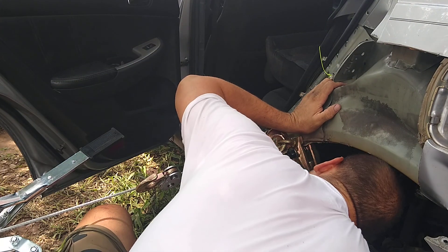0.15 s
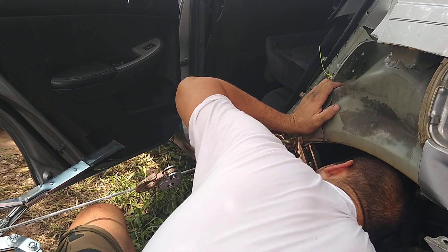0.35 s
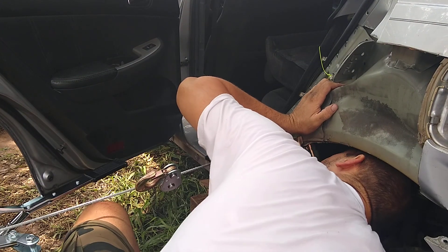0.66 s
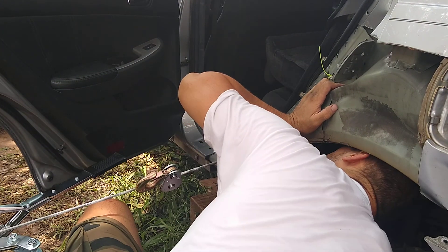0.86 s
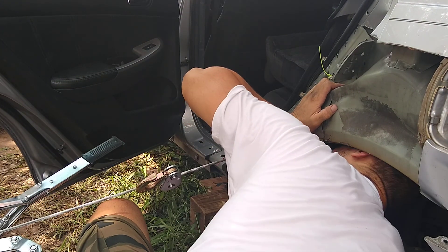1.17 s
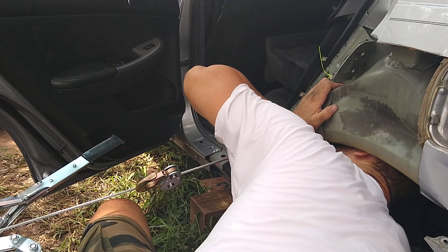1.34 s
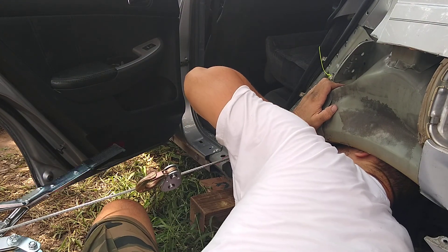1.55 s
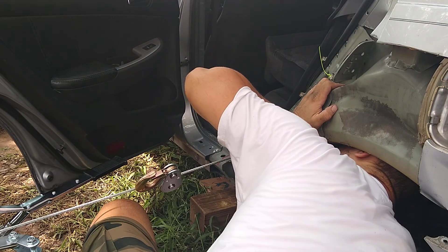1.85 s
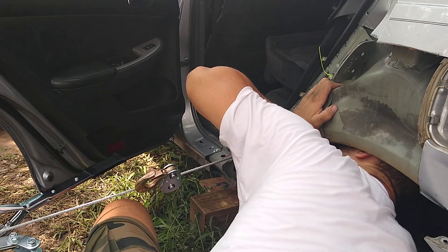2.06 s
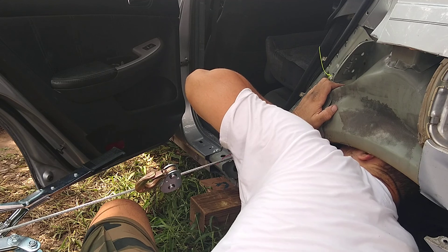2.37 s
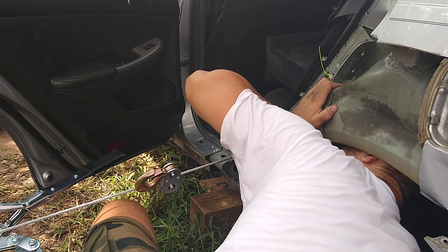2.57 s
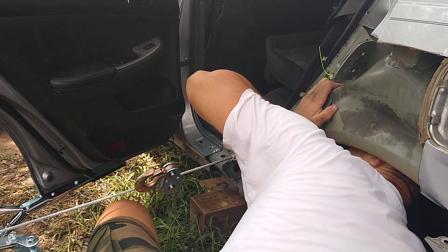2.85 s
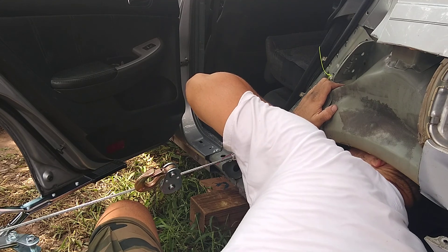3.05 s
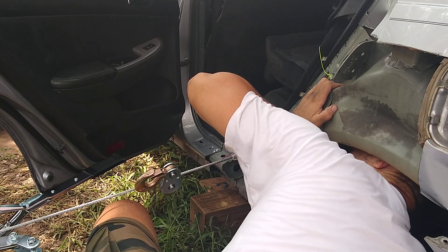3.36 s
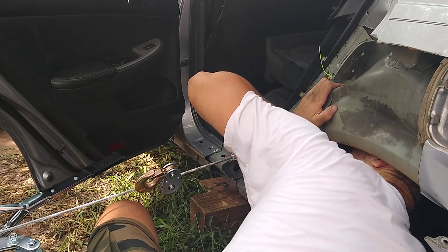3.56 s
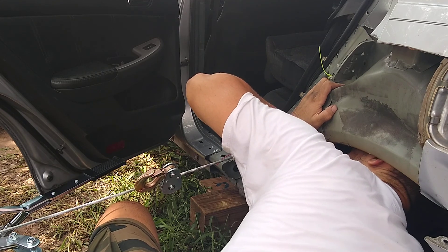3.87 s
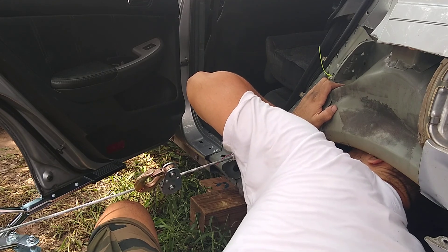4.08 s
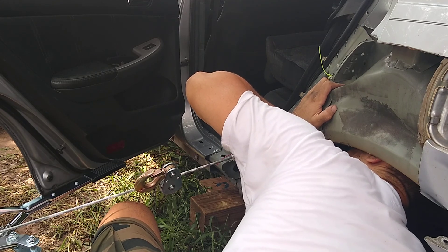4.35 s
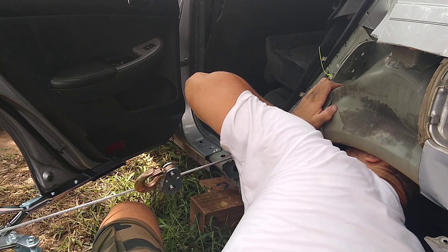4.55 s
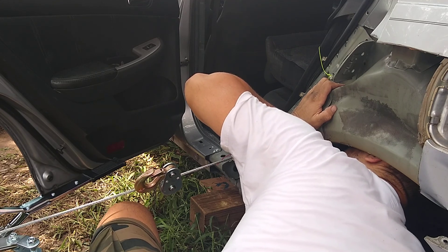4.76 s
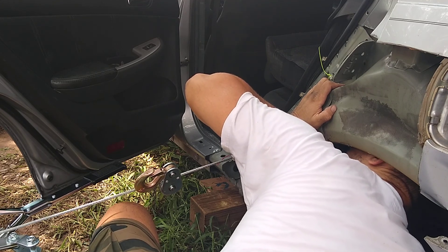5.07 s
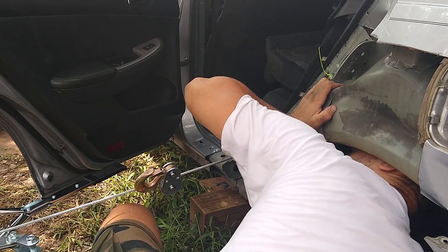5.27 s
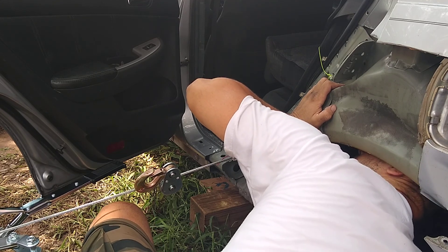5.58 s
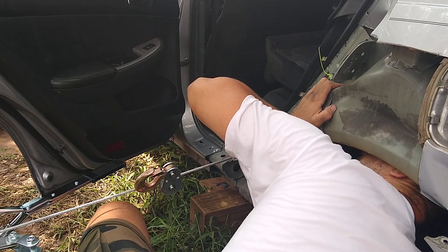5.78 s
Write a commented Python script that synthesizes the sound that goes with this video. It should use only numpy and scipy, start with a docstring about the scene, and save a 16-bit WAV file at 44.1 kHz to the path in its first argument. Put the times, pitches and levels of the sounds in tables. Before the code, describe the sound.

Outdoors and close to the microphone, a dent is hammered out of a car's wheel arch. A tool scuffs softly, one light tap follows, then steady, loud blows begin. Three loose clangs with quick rebounds give way to three firmer thuds, then five more ringing sheet metal clangs. After a slight gap, one dull blow ends the run. A very quiet open-air rumble and hum lie underneath.

```python
"""Faint scuffs of a tool being placed, a light tap, then a hammer knocks a dent out of a car's rear wing
from inside the wheel arch, outdoors, close by. On loose sheet the blow clangs and the head often drops
back onto the metal; on a braced spot it gives one duller thud. Each contact is a noise crack plus decaying
panel modes. The hollow body rings on briefly, over a low rumble and a faint hum."""
import sys
import numpy as np
from scipy import signal
from scipy.fft import rfft, irfft, next_fast_len
from scipy.io import wavfile

SR = 44100
rng = np.random.default_rng(int(sys.argv[2]) if len(sys.argv) > 2 else 0)


def file_out(sig):
    """Save sig as 16-bit WAV at sys.argv[1]."""
    # one column per channel
    cols = np.atleast_2d(sig).T
    # limit, then scale
    lim = np.clip(cols, -1, 1)
    pcm = np.round(lim * 32767).astype(np.int16)
    wavfile.write(sys.argv[1], SR, pcm)


N = 261072
RING_S = np.arange(24576) / SR  # time axis of one contact
LEFT_RIGHT = np.array([[1], [-1]])

# (time [s], level [dB], spot [0 loose, 1 braced], bite [dB], after-ring [dB])
# bite: treble of a square hit against a glancing one
HAMMER_BLOWS = [ (1.283, -12, .9, -27.5, -7), (1.619, 1, 0.078, -1.5, -5), (2.006, 0, .1, -1.5, 0.5),
                (2.428, .5, 0.11, -3, -1), (2.869, 1, 0.77, -8.5, -4), (3.240, -3.5, 0.98, 2, -4.5),
                (3.516, -1, 0.93, -1, -2.5), (3.831, .5, .15, 1.5, -3.5), (4.123, -0.5, 0, -0.5, -1),
                (4.454, 0, 0.058, -6.5, 1), (4.764, .5, .1, 0, 3), (5.082, 1, 0.054, -2.5, 0.5),
                (5.670, 1, 1, -14.5, -3.5)]
# (frequency [Hz], loose gain [dB], braced gain [dB], bite share [dB/dB])
BLOW_EQ = [(300, 1.2, 2, 0.1657), (750, 0, -0.5, 0), (1400, -.5, -6.5, 0.23), (3480, 0.7, -2, 0.78),
           (10000, 1.5, 1.5, 1.5)]
# (time [s], level [dB])
HAMMER_REBOUNDS = [(1.405, -28.5), (1.693, -5), (2.063, -1), (2.117, -8), (2.542, -5), (4.181, -4),
                   (4.513, -4), (4.823, -2.5), (5.132, -2)]
# contact crack: (frequency [Hz], gain [dB])
CRACK_EQ = [(50, -38), (200, -14.5), (800, 4.5), (2000, -1), (4300, -4.5), (5700, -17.5), (7000, -21),
            (12000, -32.5), (16000, -31.5)]
# (frequency [Hz], loose level [dB], braced level [dB], t60 [s])
WING_MODES = [ (142.3, -33, -29, 0.48), (185, -34.5, -16, 0.17), (228, -11.5, -19, 0.15),
              (243.9, -17, -6.5, 0.12), (253.2, -24, -51.5, 0.37), (302, -37.5, -20, 0.084),
              (342.9, -23.5, -3, .085), (393, -35.5, -13, .1), (423, -25, -24.5, 0.032),
              (472.9, -24, -24.5, 0.2), (513, -26.5, -21.5, 0.19), (602.8, -24, -22, 0.15),
              (647, -37.5, -22, 0.039), (722, -16.5, -32.5, .11), (804.4, -21.5, -33, 0.23),
              (855, -24, -19.5, 0.14), (1029, -19.5, -25, 0.051), (1060.8, -17.5, -31, 0.18),
              (1190, -33.5, -39, 0.25), (1414, -26.5, -43, 0.22), (1474, -19.5, -32.5, 0.039),
              (1685, -34.5, -40.5, 0.33), (1680, -33, -46.5, 0.067), (2075, -27, -28.5, 0.13),
              (2450, -21, -45, 0.12), (2675, -28, -16, 0.047), (3050, -35, -44.5, 0.032),
              (3540, -34.5, -57, 0.078), (3450, -37, -46, 0.078), (3650, -33, -53, .08)]
# crowded modes: (centre [Hz], clang [dB], clang t60 [s], after-ring [dB], its t60 [s], L/R likeness [0-1])
SHEET_BANDS = [ (40.6, -27.5, 0.2, -39.5, .5, 0.2), (108, -21, 0.33, -15, 0.96, 0.7),
               (225, -2.5, 0.033, -1, 0.43, 0.2), (396, 1, 0.11, -10.5, 0.39, 0.8),
               (910, 5, 0.069, -16, 0.42, 0.92), (1520, -0.5, .09, -19.5, 0.43, 0.6),
               (2266, -7.5, 0.027, -21.5, .37, 0.89), (2970, -3, 0.068, -21, 0.39, 0),
               (4480, -12.5, 0.017, -25, 0.34, 0.8), (5260, -13, 0.059, -34, 0.44, 0.2),
               (6500, -28, 0.066, -42, .36, 0.6), (15300, -39, 0.088, -59.5, 0.69, 0.15)]
# bodywork tones: (time [s], frequency [Hz], level [dB], t60 [s])
BODY_TONES = [(3.242, 1270, -17.5, 0.086), (3.241, 1930, -11.5, 0.072), (3.515, 1408, -51.5, 0.56),
              (5.082, 1324, -62, 1.8), (5.669, 1402, -47, 0.55)]
# (time [s], level [dB], time to fall 30 dB [s])
TOOL_SCUFFS = [(.004, -39.5, 0.058), (0.058, -52, 0.14), (0.094, -50.5, 0.16)]
# (frequency [Hz], gain [dB])
SCUFF_EQ = [(100, 7.5), (400, 11), (800, -2.5), (1400, -1.5), (2200, -7.5), (3300, -3.5), (5600, -15.5),
            (8000, -31)]
# open air: (frequency [Hz], relative density [dB])
RUMBLE_EQ = [(15, -69), (25, -31), (120, 3), (185, -4), (206, -4), (285, -0.5), (326, -6), (476, -17),
             (575, -17), (714, -22.5), (775, -17.5), (936, -22.5), (1190, -23), (2000, -34), (16000, -49.5)]
# (frequency [Hz], level [dB])
HUM_TONES = [(118, -74), (245, -75), (294, -78), (769, -79), (829, -84.5)]
# microphone ports: (frequency [Hz], left minus right [dB])
MIC_BALANCE = [(60, 3.5), (110, 4), (200, -4.5), (380, -1.5), (700, -3), (1290, 0.5), (2380, -0.5),
               (4400, 2), (8120, 3.5), (15000, 0.5)]
# microphone ports: (frequency [Hz], left lead [rad])
MIC_PHASE = [(0, 0), (1380, 0.0), (2070, -3.4), (2580, -3.3), (3960, -9.2), (4650, -9.6), (5000, -9.8),
             (5430, -7.0), (6720, -3.2), (9300, -10.6), (12200, -2.2), (13700, -6.6), (15300, -0.2),
             (16100, 0.5)]


def hammer_blows(shared_noise, contact_s=0.0009, softening=0.85):
    """Blows coloured by where and how squarely they land; a light tap presses home more slowly."""
    out = np.zeros((2, N))
    hz, loose_db, braced_db, bite_share = np.transpose(BLOW_EQ)
    for start_s, db, braced, bite_db, ring_db in HAMMER_BLOWS:
        press = 1 - np.exp(-RING_S * undb(db * softening) / contact_s)
        tone_db = loose_db + braced * (braced_db - loose_db) + bite_share * bite_db
        blow = strike(shared_noise, braced, ring_db) * press
        add(out, start_s, undb(db) * colour(blow, list(zip(hz, tone_db))))
    return out


def hammer_rebounds(shared_noise, settle_s=0.0014):
    """The loosely held head drops back; settling blunts the attack, and weaker rebounds are duller."""
    out = np.zeros((2, N))
    settle = 1 - np.exp(-RING_S / settle_s)
    for start_s, db in HAMMER_REBOUNDS:
        treble_db = -8 + 1.2 * db
        eq = [(250, -4), (1000, treble_db * .6), (4000, treble_db), (12000, treble_db * 1.7)]
        rebound = strike(shared_noise, braced=0, ring_db=-3) * settle
        add(out, start_s, undb(db) * colour(rebound, eq))
    return out


def strike(shared_noise, braced, ring_db, shared_power=0.33):
    """Steel on sheet: crack, clang, after-ring and wing modes, partly alike in every contact."""
    fresh_noise = rng.standard_normal(shared_noise.shape)
    crack_noise, sheet_noise = np.sqrt(shared_power) * shared_noise + np.sqrt(1 - shared_power) * fresh_noise
    crack = colour(stereo(*crack_noise, likeness=1) * decay(t60_s=.028), CRACK_EQ)
    clang, after_ring = sheet_modes(sheet_noise)
    return uneven_radiation(crack + clang + undb(ring_db) * after_ring) + wing_modes(braced)


def wing_modes(braced, detune=.005, scatter_db=2.07, phase_spread_rad=0.13):
    """Separate modes; each blow lands a little elsewhere and weights them anew."""
    out = np.zeros((2, len(RING_S)))
    for hz, loose_db, braced_db, t60_s in WING_MODES:
        level_draw, pitch_draw, phase_draw = rng.standard_normal(3)
        db = loose_db + braced * (braced_db - loose_db) + scatter_db * level_draw
        phase = 2 * np.pi * hz * (1 + detune * pitch_draw) * RING_S
        offset_rad = LEFT_RIGHT / 2 * phase_spread_rad * phase_draw
        envelope = build_up(hz, cycles=0.99) * decay(t60_s) * (RING_S < t60_s)
        out += undb(db) * np.sin(phase + offset_rad) * envelope
    return out


def sheet_modes(noise, spread_s=0.0041):
    """Crowded modes as noise bands: a fast clang, then a slower ring spreading through the body."""
    spectrum, hz = rfft(noise), np.fft.rfftfreq(len(RING_S), 1 / SR)
    centres_hz = [row[0] for row in SHEET_BANDS]
    clang, body = 0, 0
    for centre_hz, clang_db, clang_t60_s, body_db, body_t60_s, likeness in SHEET_BANDS:
        triangle = curve(hz, [(at_hz, float(at_hz == centre_hz)) for at_hz in centres_hz])
        band = stereo(*irfft(spectrum * triangle), likeness) * build_up(centre_hz, cycles=0.85)
        clang += band * undb(clang_db) * decay(clang_t60_s)
        body += band * undb(body_db) * decay(body_t60_s)
    return clang, body * (1 - np.exp(-RING_S / spread_s))


def build_up(hz, cycles):
    """Bending waves are slow in the bass: a mode builds up over a number of its own cycles."""
    return 1 - np.exp(-RING_S * hz / cycles)


def uneven_radiation(sound, patchy_db=4.5, flutter_db=1.67):
    """Some groups of high modes radiate better than others; the buzzing sheet flutters the level."""
    hz = np.arange(1500, 16000, 170)
    patches_db = patchy_db * rng.standard_normal(len(hz)) * (1 - hz[0] / hz)
    flutter = wander(RING_S, knots_s=RING_S[::130])
    return colour(sound, list(zip(hz, patches_db))) * undb(flutter_db * flutter)


def body_tones():
    """Thin single tones that some blows leave ringing in the bodywork."""
    out, t = np.zeros((2, N)), np.arange(N) / SR
    for start_s, hz, db, t60_s in BODY_TONES:
        add(out, start_s, undb(db) * np.sin(2 * np.pi * hz * t)[None] * decay(t60_s, t))
    return out


def tool_scuffs():
    """The tool rubs the metal as it is placed: short noise bursts."""
    out = np.zeros((2, N))
    for start_s, db, fall_s in TOOL_SCUFFS:
        rub = stereo(*rng.standard_normal((2, len(RING_S))), likeness=0.67) * decay(2 * fall_s)
        add(out, start_s, undb(db) * colour(rub, SCUFF_EQ))
    return out


def outdoors(rumble_db=-61, waver=0.5, left_bias_db=2.5):
    """Low open-air rumble with a faint wavering hum."""
    air = colour(stereo(*rng.standard_normal((2, N)), likeness=0.61), RUMBLE_EQ)
    out = air * undb(rumble_db) / air.std()
    t = np.arange(N) / SR
    knots_s = np.linspace(0, t[-1], 110)
    for hz, db in HUM_TONES:
        drift_rad = 2 * wander(t, knots_s)
        swell = 1 + waver * wander(t, knots_s)
        out += np.sqrt(2) * undb(db) * swell * np.sin(2 * np.pi * hz * t + drift_rad)
    return out * undb(LEFT_RIGHT / 2 * left_bias_db)


def undb(db):
    """Decibels to gain."""
    return 10 ** (np.asarray(db) / 20)


def decay(t60_s, t=RING_S):
    """Exponential fall, 60 dB in t60_s."""
    return np.exp(-np.log(1000) * t / t60_s)


def wander(t, knots_s):
    """Straight lines between random values at the knots."""
    return np.interp(t, knots_s, rng.standard_normal(len(knots_s)))


def curve(hz, points):
    """Interpolate (frequency [Hz], value) on a log-frequency axis."""
    at_hz, value = np.transpose(points)
    return np.interp(np.log(hz + 1), np.log(at_hz), value)


def colour(sound, eq):
    """Minimum-phase filter from (frequency [Hz], gain [dB])."""
    size = 2 * next_fast_len(sound.shape[-1] // 2 + 2048)
    gain = undb(curve(np.fft.rfftfreq(size, 1 / SR), eq))
    cepstrum = irfft(np.log(gain))
    cepstrum[1:size // 2] *= 2
    cepstrum[size // 2 + 1:] = 0
    return irfft(rfft(sound, size) * np.exp(rfft(cepstrum)))[..., :sound.shape[-1]]


def stereo(mid, side, likeness):
    """Two unrelated signals to left and right with correlation `likeness`."""
    return np.sqrt((1 + likeness) / 2) * mid + np.sqrt((1 - likeness) / 2) * side * LEFT_RIGHT


def add(out, start_s, sound):
    """Mix a sound in at start_s."""
    i = int(start_s * SR)
    out[:, i:i + sound.shape[1]] += sound[:, :N - i]


def scene():
    """The work reaches two microphone ports with pitch-dependent level and phase, over the background."""
    shared_noise = rng.standard_normal((2, 2, len(RING_S)))
    work = hammer_blows(shared_noise) + hammer_rebounds(shared_noise) + body_tones() + tool_scuffs()
    left, right = rfft(work)
    hz = np.fft.rfftfreq(N, 1 / SR)
    lead_rad = np.interp(hz, *np.transpose(MIC_PHASE))
    lean = undb(curve(hz, MIC_BALANCE) / 2) * np.exp(.5j * lead_rad)
    return irfft(np.array([left * lean, right / lean]), N) + outdoors()


def record(dry, low_cut_hz=95, high_cut_hz=15200):
    """Low cut, soft clip, steep high cut."""
    low_cut = signal.butter(2, low_cut_hz, "high", fs=SR, output="sos")
    high_cut = signal.ellip(8, .2, 70, high_cut_hz, fs=SR, output="sos")
    rounded = np.tanh(signal.sosfilt(low_cut, dry))
    return signal.sosfilt(high_cut, rounded)


dry = scene()
out = record(dry)
file_out(out)
```